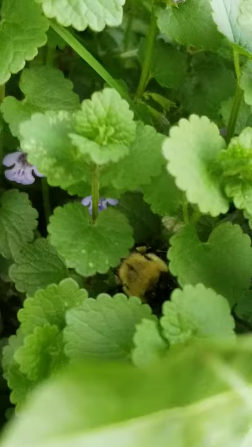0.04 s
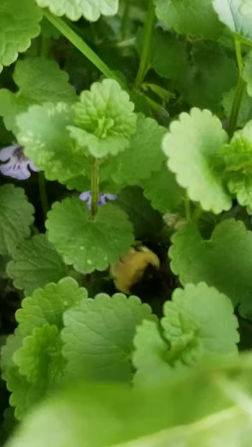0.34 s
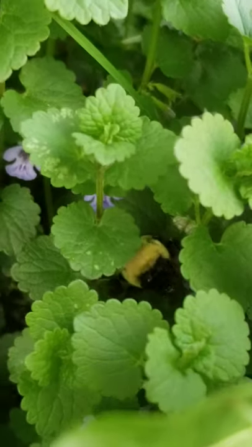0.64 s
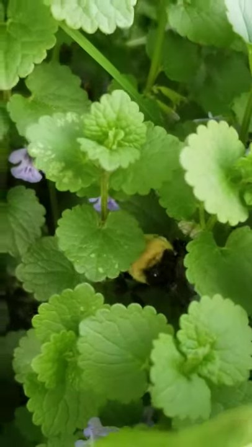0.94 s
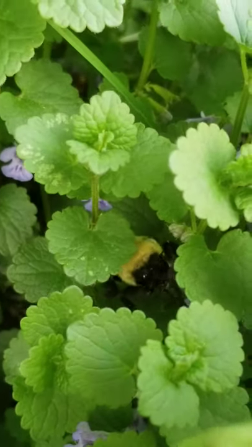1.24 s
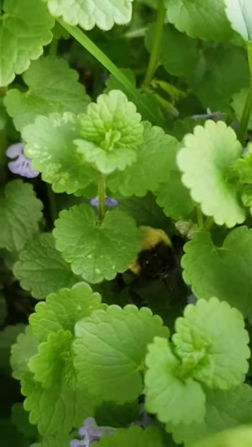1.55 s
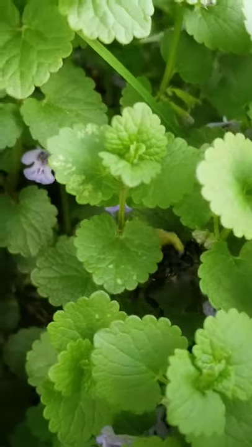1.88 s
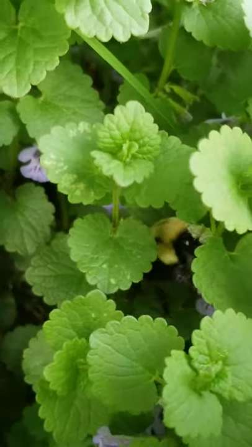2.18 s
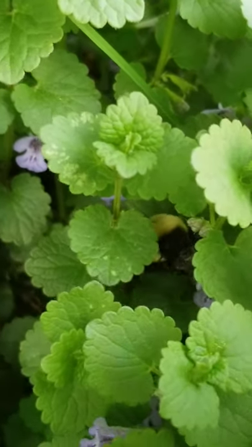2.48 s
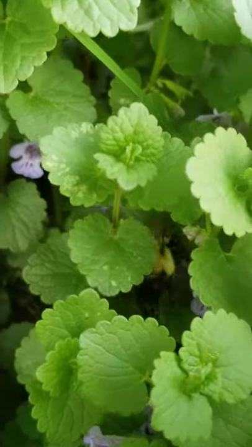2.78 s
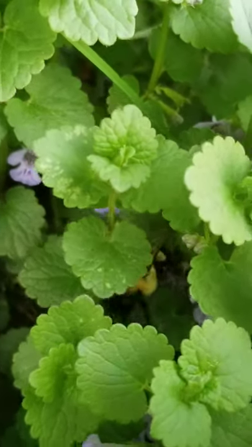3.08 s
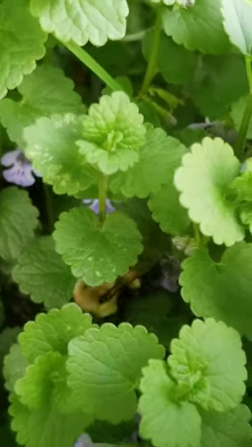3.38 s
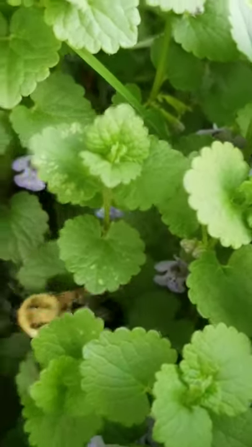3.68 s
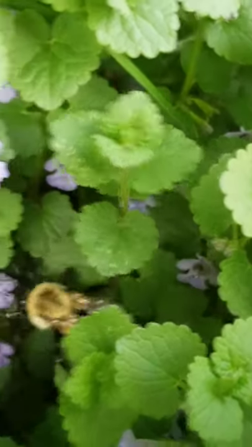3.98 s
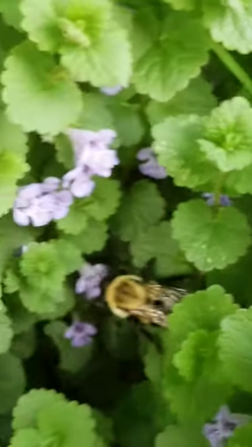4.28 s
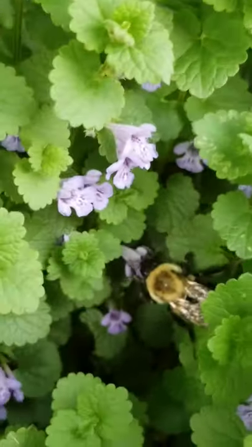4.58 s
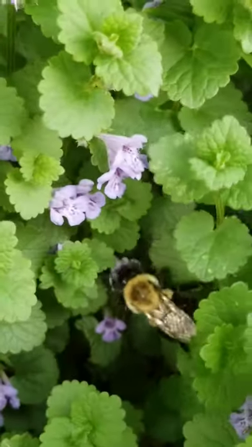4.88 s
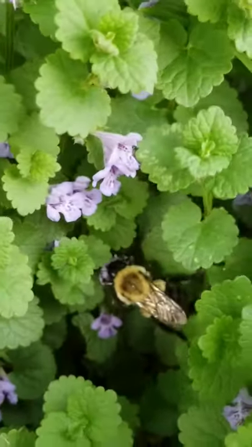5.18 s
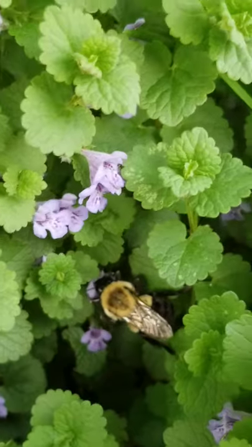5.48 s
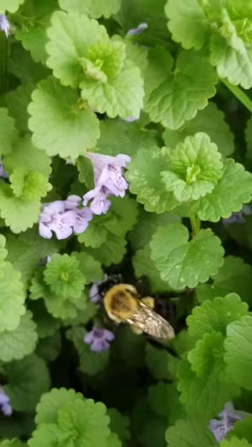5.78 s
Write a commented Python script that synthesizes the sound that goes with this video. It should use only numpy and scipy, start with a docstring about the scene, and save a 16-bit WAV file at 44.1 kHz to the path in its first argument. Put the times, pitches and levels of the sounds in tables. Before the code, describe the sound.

A low, bee-like drone, most likely a distant propeller plane, hums through a garden for the whole six seconds and is the main sound. It wavers in the moving air, sinks slightly in pitch and turns brighter between about 2 and 3.5 seconds. Close to the microphone, a bumble bee crawls through low plants: a very soft leaf slide comes at 0.5 seconds, then faint, dry stem ticks from 0.7 to 1.1 seconds, with a small leaf bump and rustle at 1 second. Very faint, distant bird calls and chirps are scattered from about 2 seconds onward. Around 5.4 seconds a mild gust lifts the low rumble, and a few more stem ticks, a leaf bump and a brief slide follow. A soft outdoor rumble, a low rush of air and light microphone hiss lie underneath throughout.

```python
"""A low, bee-like drone, most likely a far propeller plane, fills a garden: exhaust and propeller
harmonics that sink slightly in pitch, brighten once and waver in the moving air.
Close by, a bumble bee crawls through low plants: stems tick, leaves bump, rustle and slide.
Underneath: outdoor rumble and rush, faint far bird calls and chirps, and microphone hiss."""
import sys
import numpy as np
from scipy.fft import rfft, irfft, next_fast_len
from scipy.io import wavfile
from scipy.ndimage import map_coordinates

SR = 44100
rng = np.random.default_rng(int(sys.argv[2]) if len(sys.argv) > 2 else 0)


def master(y):
    """Save y as 16-bit WAV."""
    cut = np.clip(np.atleast_2d(y).T, -1, 1)
    pcm = np.round(cut * 32767)  # scale
    wavfile.write(sys.argv[1], SR, pcm.astype(np.int16))


N = 261954
TIME_S = np.arange(N) / SR

# Strong second harmonic of the drone. Each row: time in seconds, level in dB.
HUM_LEVELS = [(0.07, -43), (0.25, -37.5), (1.21, -35), (1.5, -40.5), (1.64, -36.5), (2.0, -40), (2.25, -36),
              (2.33, -40.5), (2.57, -37), (2.73, -41), (2.76, -38), (4.21, -41), (4.27, -39), (4.84, -41),
              (5.33, -38), (5.43, -43), (5.79, -37), (5.9, -38)]
# Other harmonics. Each row: order, level in dB, gain in the swell in dB, trend in dB per second.
HARMONICS = [(1, -62, 1.5, 0), (3, -56, 2.5, .35), (4, -58.5, 7.5, .45), (5, -66.8, 7.2, -.2),
             (6, -69, 5.5, -2.4), (7, -83, 11.5, .5), (8, -89, 12, 0), (9, -91, 16, 0), (10, -92, 13, -.6)]
# Weak lines between the harmonics. Each row: frequency in Hz, relative level in dB.
CYLINDER_SPECTRUM = [(140, -12.5), (220, -24.5), (330, -24.5), (400, -25.5), (500, -29.5), (560, -33),
                     (660, -43.5)]
# Noise spectra. Each row: frequency in Hz, relative density in dB.
RUMBLE_SPECTRUM = [(10, -24.5), (16, -17), (25, -10), (32, -5.5), (42, -7), (58, -2), (85, 0.5), (110, 0.5),
                   (150, -5), (200, -13.5), (300, -27), (600, -70)]
RUSH_SPECTRUM = [(80, -20), (150, -2.5), (200, -1.5), (260, -1), (330, -4.5), (400, -9.5), (500, -14.5),
                 (650, -23.5), (1000, -31.5), (2000, -48.5), (5000, -80)]
HISS_SPECTRUM = [(100, -1.5), (700, 5), (1050, 6), (1600, 2.5), (2300, 1), (3200, 1), (5000, -1.5),
                 (7500, -4), (10000, -3), (13000, -0.5), (16000, -2.5)]
LEAF_SPECTRUM = [(200, -17), (450, -7.5), (600, -7.5), (770, 2.5), (1000, -7), (1250, -0.5), (1600, -21),
                 (3200, -20.5), (6000, -42.5)]
# Stereo likeness of noise. Each row: frequency in Hz, left-right correlation.
COHERENCE = [(25, 0), (50, 0.39), (75, 0.65), (150, 0.81), (280, 0.72), (400, .68), (550, .45),
             (1000, 0.028), (2500, 0)]
# Sliding leaves. Each row: centre in seconds, peak level in dB, length in seconds.
LEAF_SLIDES = [(0.465, -78, .035), (5.526, -73, .03)]
# Flicking stems. Each row: start in seconds, relative level in dB, resonance in Hz.
STEM_TICKS = [(0.707, -57, 2690), (0.711, -56, 3700), (0.787, -57.5, 3800), (0.849, -62, 3400),
              (1.008, -60, 2600), (1.014, -59, 3000), (1.027, -56, 2900), (1.067, -61, 3200),
              (5.366, -63, 2600), (5.424, -65, 2700), (5.511, -65, 6200), (5.515, -57.5, 6200)]
# Bumped leaves. Each row: start in seconds, relative level in dB, 30 dB decay time in seconds.
LEAF_BUMPS = [(1.008, -52, .048), (1.054, -64, .07), (5.365, -56, 0.011)]
# One small bird. Each row: centre in seconds, peak level in dB.
BIRD_CHIRPS = [(1.899, -89), (2.035, -88), (5.249, -88), (5.661, -85)]
# Far birds. Each row: centre in seconds, peak level in dB, length in seconds,
# band centre in Hz, half width in Hz.
BIRD_CALLS = [(2.47, -81.5, 0.13, 1178, 120), (3.319, -74.5, .08, 1040, 300), (3.46, -73, .06, 1020, 241),
              (4.101, -78, 0.19, 990, 170), (4.542, -76, 0.11, 1030, 280), (5.082, -78.5, 0.24, 772, 30)]

SWELL_S, SWELL_HALF_WIDTH_S = 2.85, .78
GUST_S, GUST_HALF_WIDTH_S = 5.4, .5


def amp(db):
    """dB to gain."""
    return 10 ** (np.asarray(db) / 20)


def along(points, hz):
    """Interpolate (Hz, value) points on a log axis."""
    knots_hz, values = np.transpose(points)
    return np.interp(np.log(hz + 1), np.log(knots_hz + 1), values)


def colour(points):
    """Response from (Hz, dB) points."""
    return lambda hz: amp(along(points, hz))


def wobble(rate_hz):
    """Smooth random curve, rate_hz knots a second."""
    return map_coordinates(rng.standard_normal(int(N * rate_hz / SR) + 4), [TIME_S * rate_hz])


def hump(centre_s, half_width_s):
    """Gaussian rise from 0 to 1 and back."""
    return np.exp(-((TIME_S - centre_s) / half_width_s) ** 2)


def filtered(x, response):
    """Apply a frequency response."""
    size = x.shape[-1]
    padded = next_fast_len(size + SR // 8)
    return irfft(rfft(x, padded) * response(np.fft.rfftfreq(padded, 1 / SR)), padded)[..., :size]


def resonance(hz, centre_hz, width_hz):
    """Response of one damped mode."""
    return 1j * hz * width_hz / (centre_hz ** 2 - hz ** 2 + 1j * hz * width_hz)


def noise(response, size=N):
    """Coloured stereo noise, rms 1, correlated in the bass only."""
    def mid_side(hz):
        angle = np.arccos(np.clip(along(COHERENCE, hz), -1, 1)) / 2
        return response(hz) * np.array([np.cos(angle), np.sin(angle)])

    mid, side = filtered(rng.standard_normal((2, size)), mid_side)
    stereo = np.array([mid + side, mid - side])
    return stereo / np.sqrt(np.mean(stereo ** 2) + 1e-20)


def burst(response, decay_s):
    """Sudden noise, down 30 dB after decay_s."""
    t = np.arange(SR // 5) / SR
    return noise(response, len(t)) * amp(-30 * t / decay_s)


def puff(response, length_s):
    """Noise that rises and falls, peaking 0.25 s in."""
    t = np.arange(SR // 2) / SR - .25
    return noise(response, len(t)) * np.exp(-2 * (t / length_s) ** 2)


def add(track, start_s, sound):
    """Mix a sound in at start_s."""
    part = track[:, max(round(start_s * SR), 0):][:, :sound.shape[-1]]
    part += sound[..., :part.shape[-1]]


def plane_drone(start_hz=60.34, sag_hz_per_s=.11, sag_hz_per_s2=.029, left_lead_s=.00037,
                flutter_db=1.05, waver_db=1.8, drift_rad=.12, cylinder_db=-58.5, scatter_db=2):
    """Exhaust and propeller harmonics sink as the plane passes; moving air makes each waver."""
    pulse_hz = start_hz - sag_hz_per_s * TIME_S - sag_hz_per_s2 * TIME_S ** 2
    phase = 2 * np.pi * (np.cumsum(pulse_hz) / SR + pulse_hz * np.array([[left_lead_s], [0]]))
    swell = hump(SWELL_S, SWELL_HALF_WIDTH_S)

    def partial(order, db):
        shift_rad = rng.uniform(0, 2 * np.pi) + drift_rad * wobble(9)
        return amp(db + waver_db * wobble(8)) * np.sin(order * phase + shift_rad)

    hum_db = np.interp(TIME_S, *np.transpose(HUM_LEVELS))
    out = amp(hum_db + flutter_db * wobble(24)) * np.sin(2 * phase)
    for order, db, swell_db, trend_db_per_s in HARMONICS:
        out += partial(order, db + swell_db * swell + trend_db_per_s * (TIME_S - SWELL_S))
    # Three unequal cylinders share a pipe: faint lines at thirds of the pulse rate.
    for order in [k / 3 for k in range(7, 30) if k % 3]:
        db = cylinder_db + along(CYLINDER_SPECTRUM, order * start_hz)
        db += scatter_db * rng.standard_normal()
        out += partial(order, db + 3 * swell)
    return np.sqrt(2) * out


def outdoor_rumble(level_db=-50.7, gust_db=5.5, waver_db=1.5):
    """Deep noise, lifted by one gust."""
    db = level_db + gust_db * hump(GUST_S, GUST_HALF_WIDTH_S) + waver_db * wobble(9)
    return amp(db) * noise(colour(RUMBLE_SPECTRUM))


def air_rush(level_db=-61.6, swell_db=3.2, gust_db=1.5, waver_db=.98):
    """Low rush that rises with the drone's swell and with the gust."""
    rise_db = swell_db * hump(SWELL_S, SWELL_HALF_WIDTH_S) + gust_db * hump(GUST_S, GUST_HALF_WIDTH_S)
    return amp(level_db + rise_db + waver_db * wobble(14)) * noise(colour(RUSH_SPECTRUM))


def microphone_hiss(level_db=-73.5):
    """Steady self-noise."""
    return amp(level_db) * noise(colour(HISS_SPECTRUM))


def leaf_slides(centre_hz=13500, width_hz=5000):
    """Leaves rub over each other: soft, high noise."""
    out = np.zeros((2, N))
    for centre_s, db, length_s in LEAF_SLIDES:
        rub = puff(lambda hz: resonance(hz, centre_hz, width_hz) ** 2, length_s)
        add(out, centre_s - .25, amp(db) * rub)
    return out


def stem_response(snap_hz, edge_db=-8, cutoff_hz=7200):
    """One damped stem resonance plus a bright edge, low-passed."""
    def response(hz):
        body = resonance(hz, snap_hz, width_hz=1500) ** 2
        edge = amp(edge_db) * resonance(hz, centre_hz=6200, width_hz=1800) ** 2
        return (body + edge) / (1 + (hz / cutoff_hz) ** 10)

    return response


def stem_ticks(gain_db=-5, decay_s=.008):
    """Flicked stems snap briefly."""
    out = np.zeros((2, N))
    for start_s, db, snap_hz in STEM_TICKS:
        add(out, start_s, amp(db + gain_db) * burst(stem_response(snap_hz), decay_s))
    return out


def leaf_bumps(gain_db=-6, rustle_hz=3000, rustle_db=-70, rustle_delay_s=.002, rustle_stretch=1.4):
    """A whole leaf bumps softly, then rustles on its stem."""
    out = np.zeros((2, N))
    for start_s, db, decay_s in LEAF_BUMPS:
        add(out, start_s, amp(db + gain_db) * burst(colour(LEAF_SPECTRUM), decay_s))
        rustle = burst(stem_response(rustle_hz), rustle_stretch * decay_s)
        add(out, start_s + rustle_delay_s, amp(rustle_db) * rustle)
    return out


def far_birds(chirp_s=.08, chirp_hz=3200, chirp_half_width_hz=250):
    """Distant calls and chirps, blurred into narrow noise bands."""
    out = np.zeros((2, N))
    chirps = [(centre_s, db, chirp_s, chirp_hz, chirp_half_width_hz) for centre_s, db in BIRD_CHIRPS]
    for centre_s, db, length_s, centre_hz, half_width_hz in BIRD_CALLS + chirps:
        call = puff(lambda hz: 1 / (1 + ((hz - centre_hz) / half_width_hz) ** 4), length_s)
        add(out, centre_s - .25, amp(db) * call)
    return out


def scene(left_bias_db=.3):
    """All sources, leaning slightly left."""
    bed = plane_drone() + outdoor_rumble() + air_rush() + microphone_hiss()
    plants = stem_ticks() + leaf_bumps() + leaf_slides()
    return (bed + plants + far_birds()) * amp([[left_bias_db], [-left_bias_db]])


def record(dry, open_s=.05, fade_s=.01, cutoff_hz=15750):
    """Brief silence, quick fade-in, brick-wall low-pass."""
    ramp = np.clip((TIME_S - open_s) / fade_s + .5, 0, 1)
    return filtered(dry * np.sin(ramp * np.pi / 2) ** 2, lambda hz: hz < cutoff_hz)


dry = scene()
out = record(dry)
master(out)
```